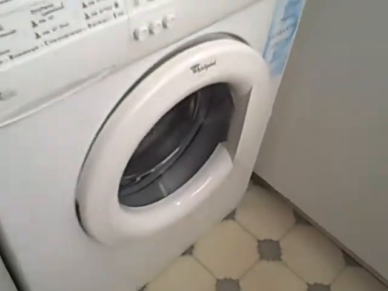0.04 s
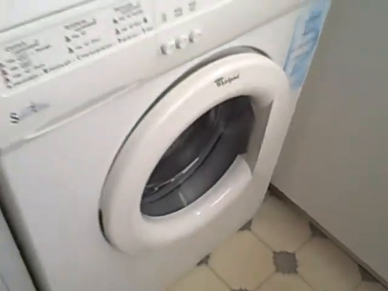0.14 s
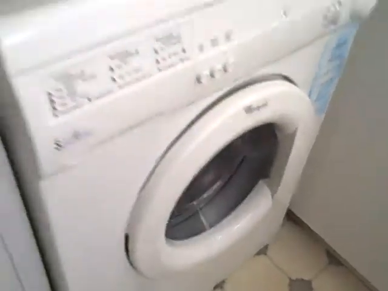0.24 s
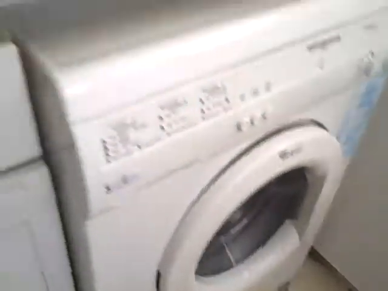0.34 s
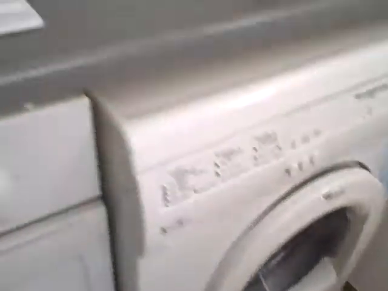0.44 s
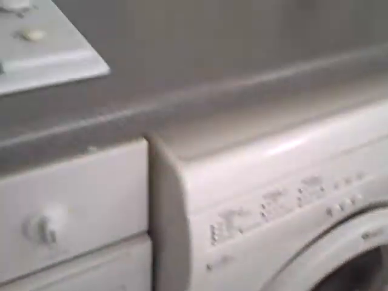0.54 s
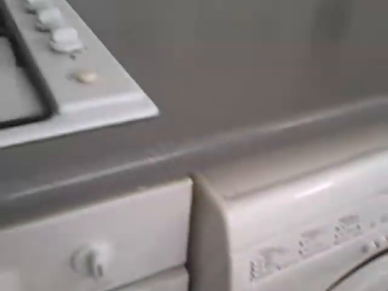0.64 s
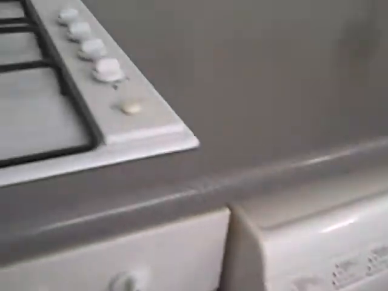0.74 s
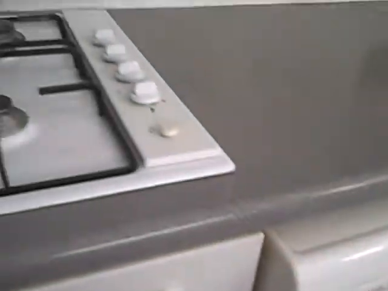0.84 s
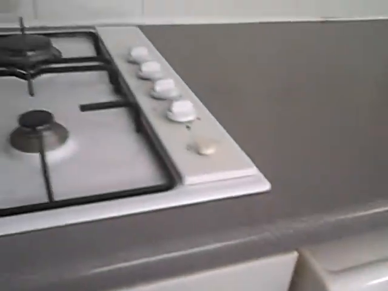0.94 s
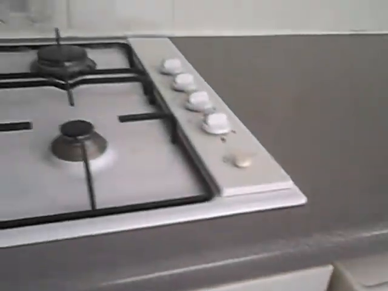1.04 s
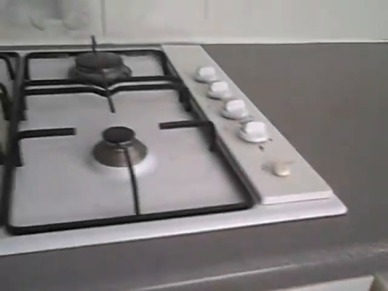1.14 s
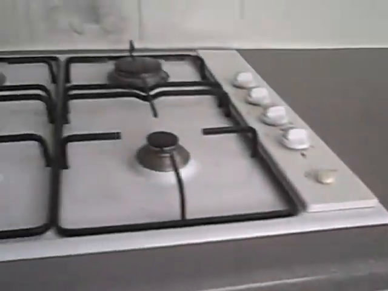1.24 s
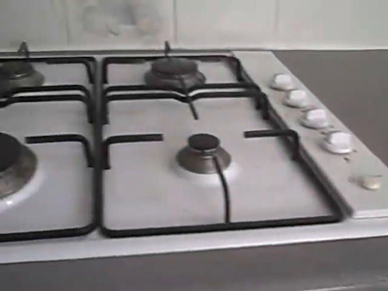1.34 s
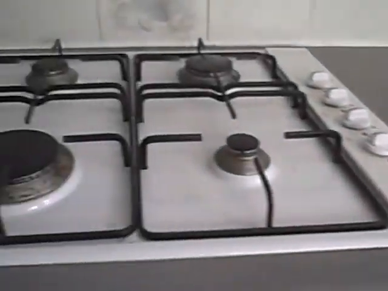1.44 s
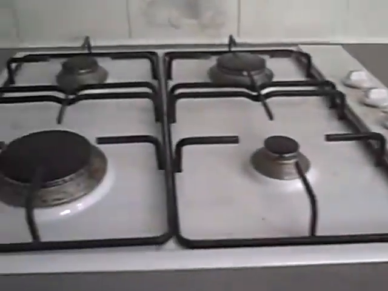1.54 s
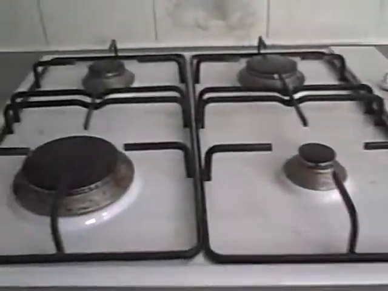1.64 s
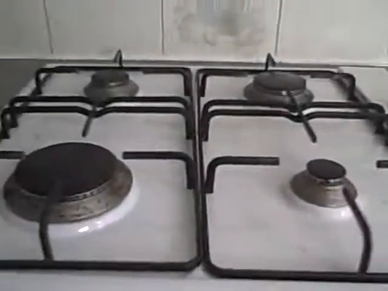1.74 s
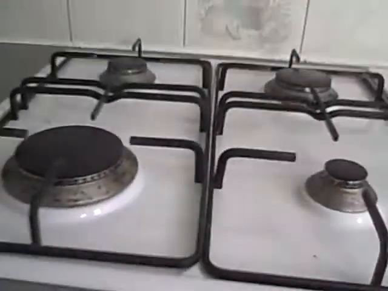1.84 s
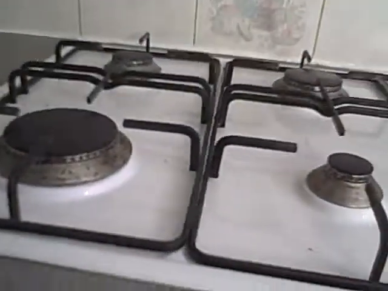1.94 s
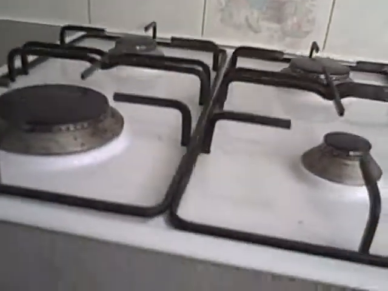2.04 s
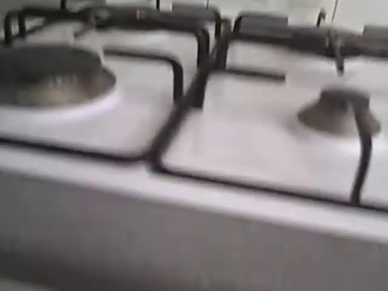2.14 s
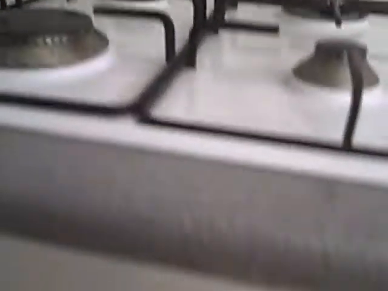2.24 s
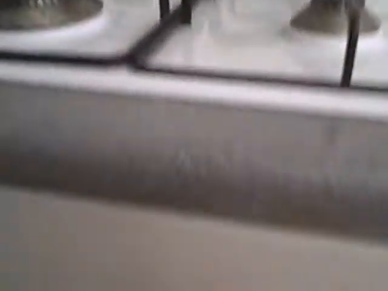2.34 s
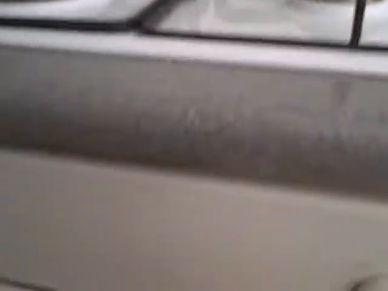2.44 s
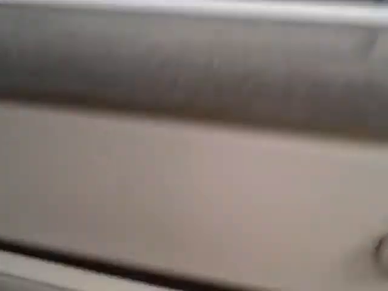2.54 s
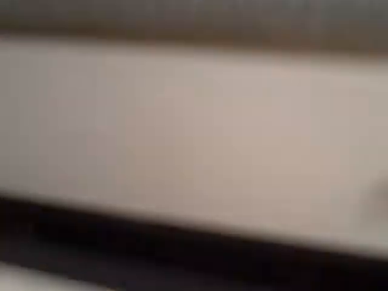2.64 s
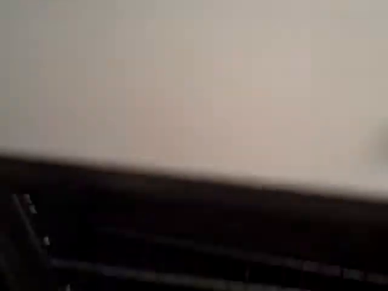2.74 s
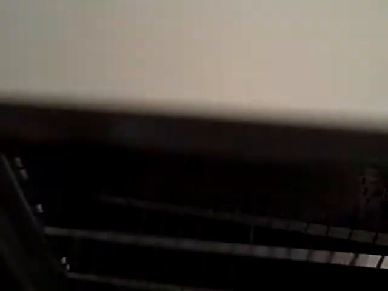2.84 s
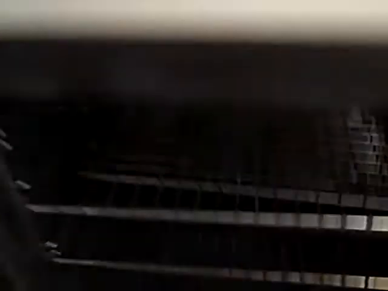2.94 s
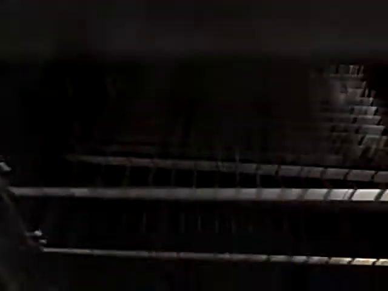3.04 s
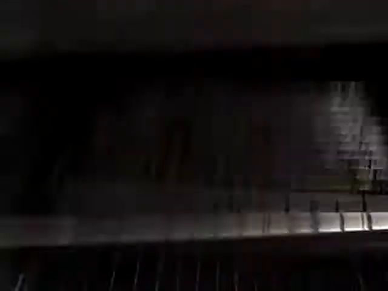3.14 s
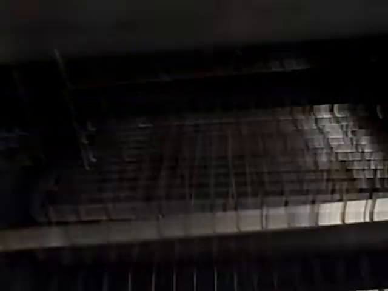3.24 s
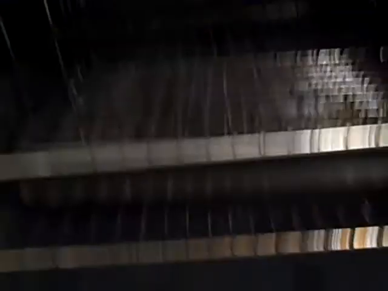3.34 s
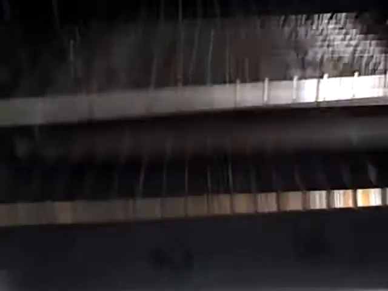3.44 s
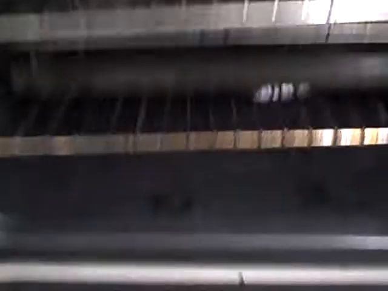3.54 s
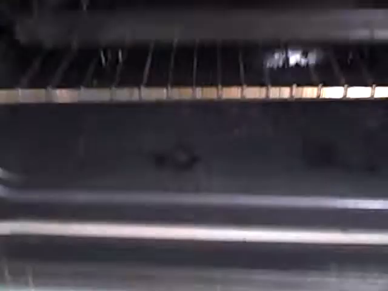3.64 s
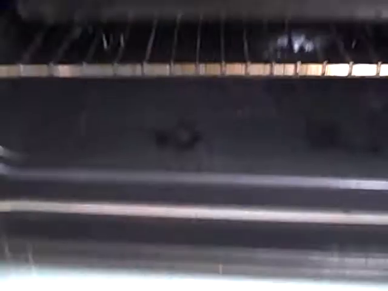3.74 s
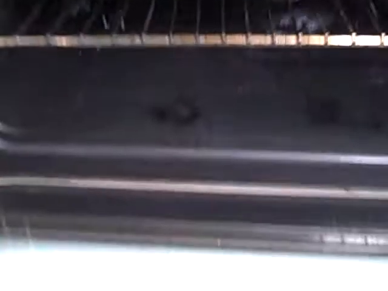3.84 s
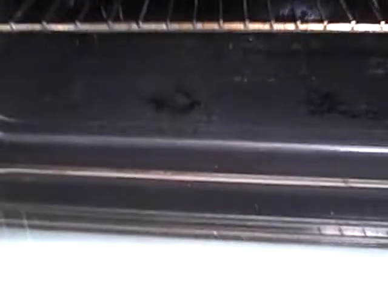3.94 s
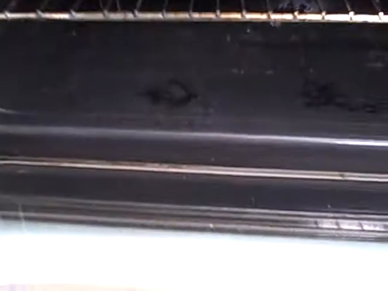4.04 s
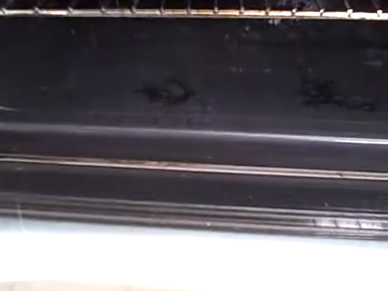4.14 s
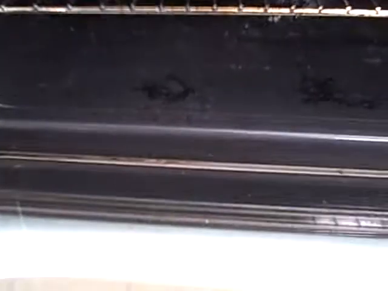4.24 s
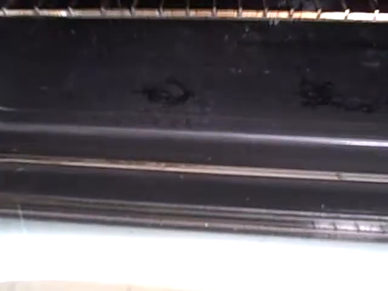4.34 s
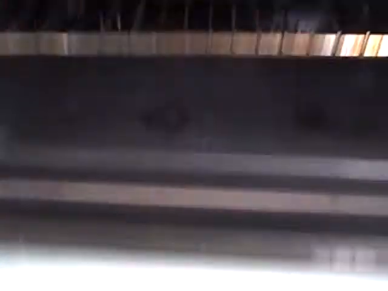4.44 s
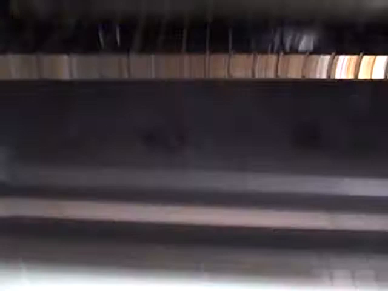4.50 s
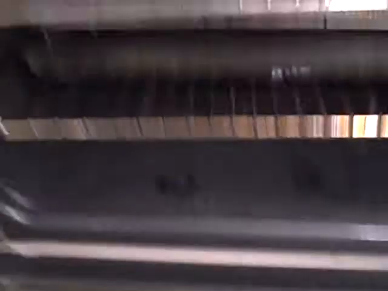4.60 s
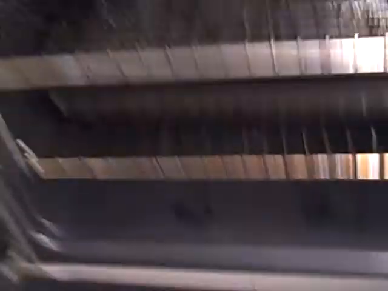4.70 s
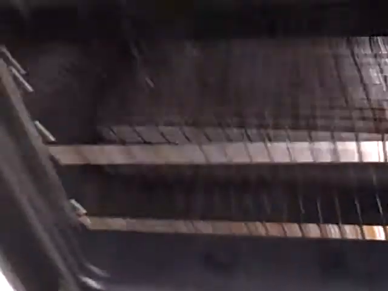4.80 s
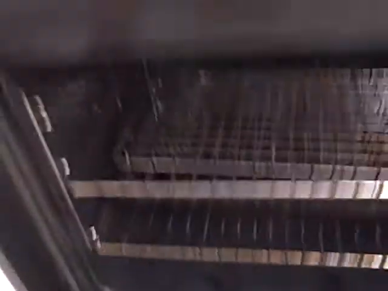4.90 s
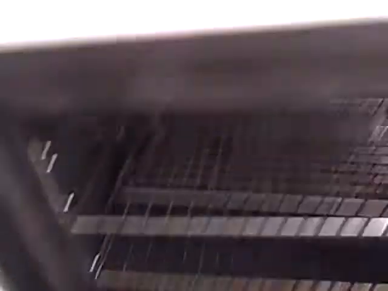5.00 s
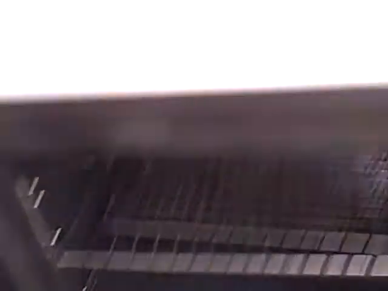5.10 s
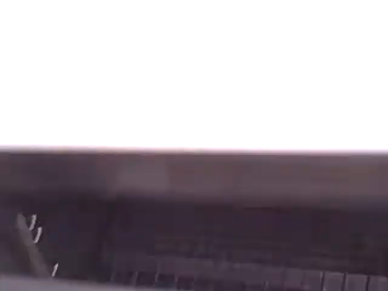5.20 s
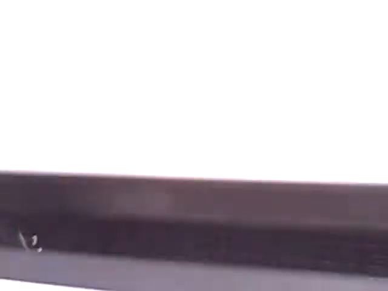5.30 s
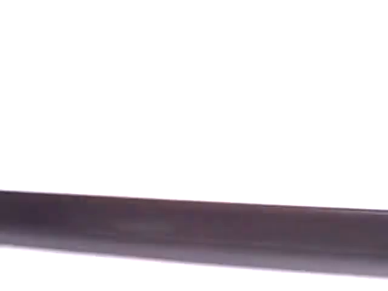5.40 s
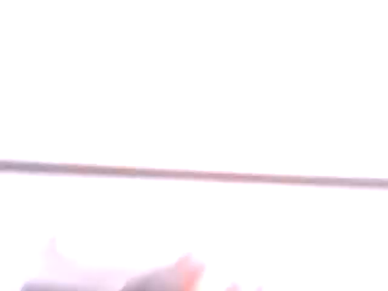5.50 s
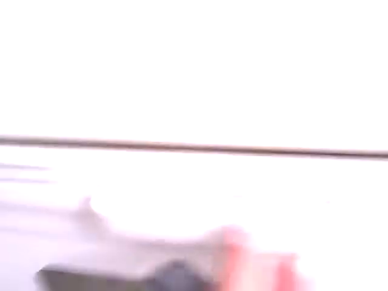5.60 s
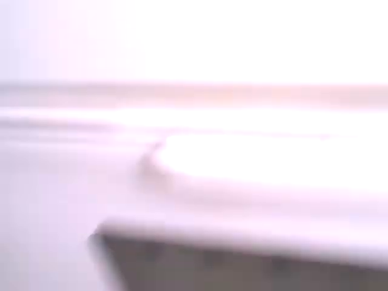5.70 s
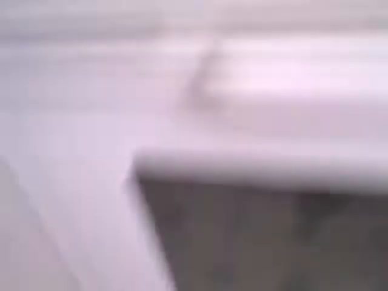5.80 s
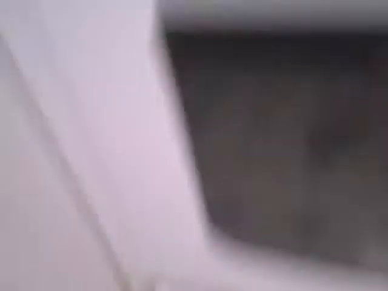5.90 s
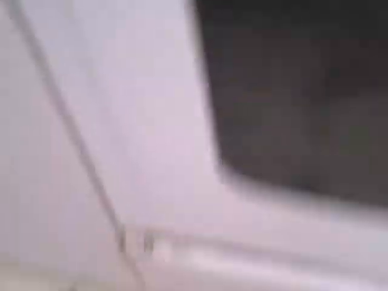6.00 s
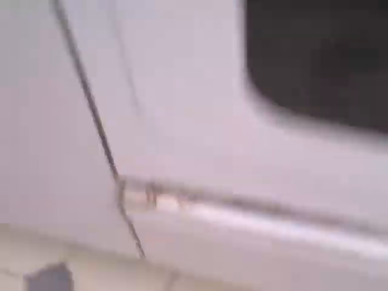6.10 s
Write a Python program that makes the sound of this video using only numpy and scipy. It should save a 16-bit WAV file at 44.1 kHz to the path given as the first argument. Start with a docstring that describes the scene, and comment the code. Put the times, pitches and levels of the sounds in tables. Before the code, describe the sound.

In a quiet humming kitchen, a metal oven door knocks open and rattles, then slams shut with a heavy, distorted boom and brief ring.

```python
"""First a small kitchen: low rumble, a fridge-like hum, faint drones, a thin camera whine and soft pips.
In front of a hand-held camera an oven door is then pulled open, knocks on its hinge stops and is slammed.
Blows and rubs are bursts of impulses that ring sheet-metal modes and room noise; small loose parts tick.
The slam pushes air as a pressure step with ringing low modes, and overloads the microphone."""
import sys
import numpy as np
from scipy import signal
from scipy.fft import rfft, irfft
from scipy.io import wavfile
from scipy.ndimage import uniform_filter1d

SR = 44100
rng = np.random.default_rng(int(sys.argv[2]) if len(sys.argv) > 2 else 0)


def inscribe(sig):
    """Save sig as 16-bit PCM at rate SR to the path in sys.argv[1].

    A 1-D sig is mono; a 2-D sig holds one channel per row.
    Samples are clipped to [-1, 1] before scaling.
    """
    pcm = np.round(np.clip(np.atleast_2d(sig).T, -1, 1) * 32767)
    wavfile.write(sys.argv[1], SR, pcm.astype(np.int16))


N = 271656
T = np.arange(N) / SR  # s
SLAM_S = 5.7162


def undb(db):
    """Amplitude factor of a level in dB."""
    return 10 ** (np.asarray(db) / 20)


def unit(x):
    """Scale to rms 1."""
    return x / np.sqrt(np.mean(x ** 2))


def unit_energy(x):
    """Scale to a sum of squares of 1."""
    return x / np.linalg.norm(x)


def curve(rows):
    """Straight lines over time through rows of time and value."""
    rows = np.array(rows)
    return np.interp(T, rows[:, 0], rows[:, 1])


def band(x, lo_hz, hi_hz):
    """Keep what lies between two frequencies."""
    return signal.sosfilt(signal.butter(2, [lo_hz, hi_hz], "bandpass", fs=SR, output="sos"), x)


def narrow(hz, width_hz):
    """Noise through one resonance, rms 1."""
    return unit(band(rng.standard_normal(N), hz - width_hz / 2, hz + width_hz / 2))


def fade(t, t60):
    """Exponential decay by 60 dB in t60 seconds."""
    return np.exp(-np.log(1000) * t / t60)


def walk(rate):
    """Random levels held 1 / rate s and slewed twice; spread near 1."""
    hold = int(SR / rate)
    steps = np.repeat(rng.standard_normal(N // hold + 1), hold)
    return 0.61 * uniform_filter1d(uniform_filter1d(steps, hold), hold)[:N]


# Blows on the oven door, from 5.7 s the slam and its bounces. Each row: time in seconds, force in dB in
# the middle band, then relative to it the thud, low, upper and treble bands in dB.
BLOWS = [(2.189, -8, -15, -5, -10.5, -11.5), (2.204, -10, -4, 3.5, -12, -16),
         (2.224, -9, -1.5, -4, -6.5, -14), (2.252, -9, -5, 2.5, -15.5, -16.5),
         (2.278, -15, -6, -8, -19, -16.5), (2.351, -20, -6, -14, -9, -10),
         (2.413, -14.5, -10, -17, -17, -28), (2.429, -17, -1, -5, -17, -10), (2.53, -27, -7, -14, -2, -24),
         (2.785, 2, -24, -19, -16, -25.5), (2.796, -3, -18, -15, -24, -35), (2.955, -10, -4, 0.5, -11, 1),
         (2.966, 5, 1, -12, -13, -30), (2.98, -2.5, -1, -3, -28, -32), (3.163, -24, -9, 1, -20, -9),
         (3.31, -16.5, -2, -14, -9, -23), (4.644, -20, -13, -8, -15, -23), (4.911, -18, -8, -6, -13, -25),
         (5.096, -20.5, -4, -11, -10.5, -23), (5.175, 3.5, 3, -3, -11, -18.5),
         (5.189, 0.4, -3.5, -1, -12.5, -21.5), (5.716, -3.5, -18, -5, -4, -4),
         (5.730, 11.5, -20, -4, -6, -10), (5.737, 9, -38, -8, -13, -12), (5.745, 4.5, -18, 2, -5, -4),
         (5.763, 0.6, -29, 7, -2.5, -5), (5.782, -1.5, -24, 3, -5, -4), (5.805, -2.5, -28, -5, -4.5, -13),
         (5.823, -8, -30, -7, -15, -12)]
CHATTER_S, RING_DB = .0033, -0.35


def knocks():
    """Each blow is a first contact and a short chatter of smaller ones; force on contact and on ring, per band."""
    force = np.zeros((len(DOOR_BANDS), N + SR))
    t = T[:SR // 8]
    for s, db, thud_db, low_db, upper_db, treble_db in BLOWS:
        hits = rng.random(len(t)) < 4000 / SR  # about 4000 contacts per second
        taps = rng.standard_normal(len(t)) * hits * np.exp(-t / CHATTER_S)
        taps[0] = 1.73
        colour_db = np.array([thud_db, low_db, 0, upper_db, treble_db])
        blow = np.outer(undb(db + colour_db), unit_energy(taps))
        # a slow thud takes the blow as one push
        blow[0] = undb(db + thud_db) * (t == 0)
        start = int(s * SR)
        force[:, start:start + len(t)] += blow
    return np.array([force, undb(RING_DB) * force])[:, :, :N]


# Hand and hinge rubbing on the door, racks rattling after the slam. Each row: start, peak and end in
# seconds, middle-band force at the peak in dB, then upper and treble bands in dB relative to it.
# A peak set past the end leaves the rub still swelling when it stops.
RUBBING = [(0.335, 0.352, 0.38, -54, -5, -10), (1.85, 2.177, 2.12, -57.5, -2, -12.5),
           (2.297, 2.546, 2.7, -51.5, -4.5, -12.5), (3.102, 3.265, 3.3, -44.5, -10, -16.5),
           (3.295, 3.321, 3.34, -38, -3, -15), (3.35, 3.582, 3.7, -56, -10.5, -11.5),
           (4.6, 4.674, 5.15, -53, -8.5, -22.5), (5.52, 5.72, 5.715, -50, -16.5, -18),
           (5.8, 5.996, 6.2, -36.5, -10, -16.5)]
RUB_EDGE_DB = -8  # level at start and end of a rub, below its peak
RUB_THUD_DB, RUB_LOW_DB, RUB_RING_DB = -10, -8.5, -10.5


def rubs():
    """Uneven stick-slip grains while hand, hinge and racks move; each rub swells towards its peak."""
    hits = rng.random(N) < 1500 / SR  # about 1500 grains per second
    uneven_db = 3.3 * walk(40) + 2.1 * rng.exponential(size=N)
    grains = unit(hits * rng.standard_normal(N) * undb(uneven_db))
    force = np.zeros((len(DOOR_BANDS), N))
    for start, peak, end, db, upper_db, treble_db in RUBBING:
        on = uniform_filter1d(1. * (T > start) * (T < end), size=600)
        swell_db = np.interp(T, [start, peak, end], [RUB_EDGE_DB, 0, RUB_EDGE_DB])
        colour_db = [RUB_THUD_DB, RUB_LOW_DB, 0, upper_db, treble_db]
        force += np.outer(undb(colour_db), on * undb(db + swell_db) * grains)
    return np.array([force, undb(RUB_RING_DB) * force])


# Modes of the door and oven box. Each row: frequency in Hz, level in dB against the other modes,
# T60 in seconds. A mode outside every band of DOOR_BANDS stays silent.
DOOR_MODES = [(92.3, 1.5, 0.38), (141.3, -12.5, 0.43), (213.5, -2.5, 0.13), (275, -11.5, 0.13),
              (407, 1, 0.22), (442, -8, 0.14), (450, -18, .25), (556, -9.5, 0.17), (639, -1, 0.18),
              (690, -4, 0.1), (805, 2, 0.088), (956, -18.5, .2), (1050, -8.5, 0.1), (1160, -18.5, 0.11),
              (1220, -13, .12), (1200, -25.5, 0.1), (1458, 5.5, 0.047), (1980, -16, 0.072),
              (2268, -2.5, 0.26), (2680, -18, 0.074), (3800, 4, 0.053), (4110, 3.5, 0.033),
              (5386, -7.5, .05), (6600, -3, .06)]


def door_response(lo_hz, hi_hz, room_t60, room_db, contact_t60):
    """What one tap sets off in a band: the contact, and the door's modes ringing on in the room; unit energy."""
    t = T[:SR]
    modes = sum(undb(db) * np.sin(2 * np.pi * hz * t) * fade(t, t60)
                for hz, db, t60 in DOOR_MODES if lo_hz <= hz < hi_hz)
    # sheet metal gives less at the top of each band
    low_heavy = band(rng.standard_normal(SR), lo_hz / 4, lo_hz * 1.198)
    noise = unit(band(low_heavy, lo_hz, hi_hz))
    contact = (modes + undb(2.5) * noise) * fade(t, contact_t60)
    onset = 1 - np.exp(-t / 0.0026)
    ring = (modes + undb(room_db) * noise * fade(t, room_t60)) * onset
    return unit_energy(contact), unit_energy(ring)


# Small loose parts: latch, hinge pin, rack. Each row: time in seconds, overall level in dB,
# main ring in Hz, relative level in dB of the second ring and the crack before their trims.
LOOSE_PARTS = [(1.329, -46, 1430, -7), (1.713, -34.5, 1580, -7.5), (2.059, -49, 674, -15),
               (2.449, -40.5, 4050, -12), (2.497, -35, 1300, -16), (2.786, -21, 780, -22),
               (2.794, -24, 560, -28), (3.684, -34, 790, -19), (3.761, -29.5, 820, -14),
               (3.878, -43, 580, -22), (4.611, -38.5, 970, -18), (4.667, -34.5, 740, -17),
               (4.676, -32, 1090, -14), (4.686, -32, 1050, -14), (4.751, -41, 785, -14),
               (4.801, -35, 800, -21), (4.811, -36, 825, -19), (4.879, -35, 778, -16),
               (4.943, -34, 720, -21), (4.983, -39, 766, -26), (5.004, -42, 805, -18),
               (5.088, -40, 890, -8)]
TICK_MAIN_DB, TICK_SECOND_DB, TICK_CRACK_DB = -2, -4, -0.5  # trims
TICK_SECOND_HZ, TICK_T60_S = 2350, .028


def ticks():
    """Two short rings, each with a close neighbour, and a brief bright crack."""
    out, t = np.zeros(N + SR), T[:SR // 8]
    onset = 1 - np.exp(-t / 0.00025)
    for s, db, main_hz, second_db in LOOSE_PARTS:
        rings = 0
        for hz, ring_db in ((main_hz, TICK_MAIN_DB), (TICK_SECOND_HZ, second_db + TICK_SECOND_DB)):
            neighbour_hz = hz * rng.uniform(1.036, 1.326)
            pair = np.sin(2 * np.pi * hz * t) + 0.74 * np.sin(2 * np.pi * neighbour_hz * t)
            rings = rings + undb(ring_db) * pair
        bright = unit(band(rng.standard_normal(len(t)), 1100, 3200))
        crack = undb(second_db + TICK_CRACK_DB) * bright * fade(t, 0.019)
        start = int(s * SR)
        out[start:start + len(t)] += undb(db) * (rings * fade(t, TICK_T60_S) + crack) * onset
    return out[:N]


# Bands of the door's answer: thud, low, middle, upper, treble. Each row: low and high edge in Hz,
# room T60 in seconds, room noise gain in dB against the modes, contact T60 in seconds.
DOOR_BANDS = [(63.4, 150, 0.92, -7.5, 0.067), (175.5, 550, 0.83, 17, 0.077), (589, 1383, 0.56, 10, 0.079),
              (1300, 3800, 0.59, 15, 0.051), (3140, 7400, 0.43, 21, 0.02)]
TICK_ROOM_DB = -6


def door():
    """Knocks and rubs played through contact, door and room, band by band; the ticks get a little of the room."""
    force = knocks() + rubs()
    # axes: contact or ring, band, time
    responses = np.array([door_response(*row) for row in DOOR_BANDS]).transpose(1, 0, 2)
    struck = signal.fftconvolve(force, responses, axes=2)[:, :, :N].sum(axis=(0, 1))
    dry_ticks = ticks()
    echo = unit_energy(rng.standard_normal(SR // 2) * fade(T[:SR // 2], 0.65))
    tick_room = undb(TICK_ROOM_DB) * signal.fftconvolve(dry_ticks, echo)[:N]
    return dry_ticks + tick_room + struck


# Low modes of the air set off by the slam. Each row: frequency in Hz, level in dB, T60 in seconds.
AIR_MODES = [(57.6, 6, 0.26), (31.3, -4.5, 0.5), (44, -35, 0.39)]
SUCK_DB, SUCK_S, SLAM_RISE_S = -13, .003, .0004


def slam_air():
    """A short dip as the door swings in, then a sudden pressure step leaves the low modes ringing."""
    t = T - SLAM_S
    step = .5 + .5 * np.tanh(t / SLAM_RISE_S)
    boom = sum(undb(db) * np.cos(2 * np.pi * hz * t) * fade(np.maximum(t, 0), t60)
               for hz, db, t60 in AIR_MODES)
    dip = undb(SUCK_DB) * np.exp(np.minimum(t, 0) / SUCK_S)
    return step * boom - (1 - step) * dip


# Centres of the soft tones, in seconds.
PIP_TIMES = [.465, .9, 1.295, 1.635]
PIP_HZ, PIP_S, PIP_DB = 2200, 0.01, -67  # PIP_S: from the centre to 1/e


def pips():
    """Short soft sine tones under bell-shaped envelopes."""
    envelope = sum(np.exp(-((T - s) / PIP_S) ** 2) for s in PIP_TIMES)
    return undb(PIP_DB) * envelope * np.sin(2 * np.pi * PIP_HZ * T)


# Colour of the room noise. Each row: frequency in Hz, relative density in dB per Hz.
ROOM_COLOUR = [(12, -12.5), (20, 5.5), (45, -8), (65, -26), (88, -6.5), (140, -10), (245, -21.5),
               (285, -23.5), (476, -23), (584, -28.5), (814, -24.5), (879, -27), (2100, -37), (7920, -43.5),
               (9000, -50.5), (11700, -95), (19800, -120)]
# Room noise, louder near the open oven and after the slam. Each row: time in seconds,
# mean level in dB of its 150 to 1500 Hz part.
AIR_LEVEL = [(0, -55), (1.7, -54.5), (2.2, -51), (3.4, -49), (4.5, -51.5), (5.1, -55.5), (5.6, -50.5),
             (6.16, -45)]
HISS_DB = -58.5  # steady gain of the same noise above 2 kHz


def room_air():
    """Broad coloured noise, gently unsteady at its low end."""
    hz = np.maximum(np.fft.rfftfreq(N, 1 / SR), 1)
    rows = np.array(ROOM_COLOUR)
    colour = undb(np.interp(np.log(hz), np.log(rows[:, 0]), rows[:, 1]))
    noise = irfft(rfft(rng.standard_normal(N)) * colour, N)
    noise = noise / np.std(band(noise, 150, 1500))
    # the camera's own hiss holds still while the room part below it comes and goes
    low = signal.sosfilt(signal.butter(2, 2000, fs=SR, output="sos"), noise)
    air = undb(curve(AIR_LEVEL) + 1.0 * walk(5.19)) * low + undb(HISS_DB) * (noise - low)
    return signal.sosfilt(signal.butter(3, 50, "highpass", fs=SR, output="sos"), air)


RUMBLE_DB, SHAKE_DB, SHAKE_RISE_S, SHAKE_T60_S = -47.5, -30, .07, 3.


def rumble():
    """Noise around 35 Hz that swells after the slam and slowly dies down."""
    after = np.maximum(T - SLAM_S, 0)
    shake = undb(SHAKE_DB) * (1 - np.exp(-after / SHAKE_RISE_S)) * fade(after, SHAKE_T60_S)
    return (undb(RUMBLE_DB) + shake) * unit(band(narrow(35.2, 19.0), 26.0, 50.4))


# Hum, strongest in front of the open oven. Each row: time in seconds, mean rms level in dB.
HUM_LEVEL = [(0, -61.5), (1.7, -53.5), (3.6, -51.5), (3.93, -45), (4.3, -52), (6.16, -49.5)]
HUM_HZ = 97.4  # mean pitch


def hum():
    """Fridge-like sine wandering in pitch and level."""
    phase = 2 * np.pi * np.cumsum(HUM_HZ + 1.52 * walk(9.3)) / SR
    return undb(curve(HUM_LEVEL) + 1.6 * walk(2.8)) * np.sqrt(2) * np.sin(phase)


# Narrow resonances of the room noise. Each row: frequency in Hz, width in Hz,
# level in dB before the throb and the descent.
RESONANCES = [(133.4, 6.4, -60), (243.8, 13, -63), (482.2, 12.5, -65), (686, 26, -73), (807.5, 18, -66.5)]
DESCENT_S, DESCENT_DB = (1.8, 2.4), -5.5


def drones():
    """Throbbing narrow noise, fainter once the camera goes down to the oven."""
    drone = sum(undb(db + 4.1 * walk(6.5)) * narrow(hz, width_hz) for hz, width_hz, db in RESONANCES)
    return undb(np.interp(T, DESCENT_S, [0, DESCENT_DB])) * drone


WHINE_HZ, WHINE_DB = 7705, -75  # mean rms level


def whine():
    """The camera's thin tone at a fixed pitch, its level trembling slightly."""
    return undb(WHINE_DB + .7 * walk(38)) * np.sqrt(2) * np.sin(2 * np.pi * WHINE_HZ * T)


def scene():
    """Oven door and slam up front, pips and room behind, as one channel."""
    background = room_air() + rumble() + hum() + drones() + whine()
    return (door() + slam_air() + pips() + background)[None]


PORT_HZ, PORT_WIDTH_HZ, PORT_DB = 3950, 600, -1
CAPSULE_HZ, TOP_HZ = 8600, 15600  # low-pass edges before and after clipping
CLIP, KNEE = .705, 15  # amplitude ceiling; a higher knee is sharper


def record(dry):
    """The microphone port rings near 4 kHz, the band ends early, then the converter clips with a round knee."""
    port_ring = band(dry, PORT_HZ - PORT_WIDTH_HZ / 2, PORT_HZ + PORT_WIDTH_HZ / 2)
    port = dry + undb(PORT_DB) * port_ring
    narrowed = signal.sosfilt(signal.ellip(10, .3, 70, CAPSULE_HZ, fs=SR, output="sos"), port)
    clipped = narrowed / (1 + np.abs(narrowed / CLIP) ** KNEE) ** (1 / KNEE)
    return signal.sosfilt(signal.ellip(8, .2, 70, TOP_HZ, fs=SR, output="sos"), clipped)


dry = scene()
out = record(dry)
inscribe(out)
```